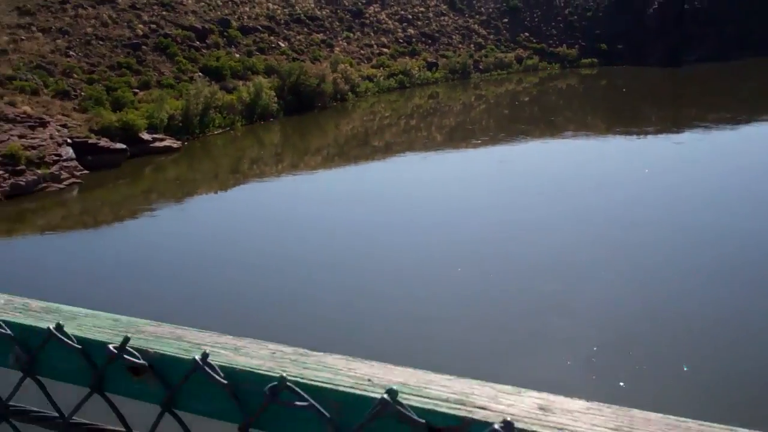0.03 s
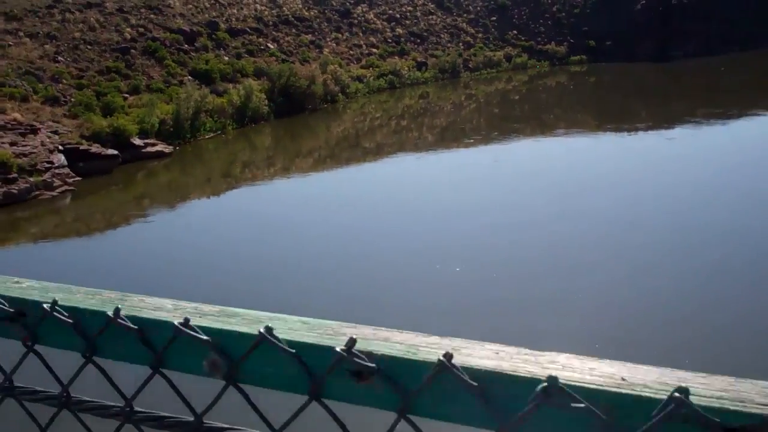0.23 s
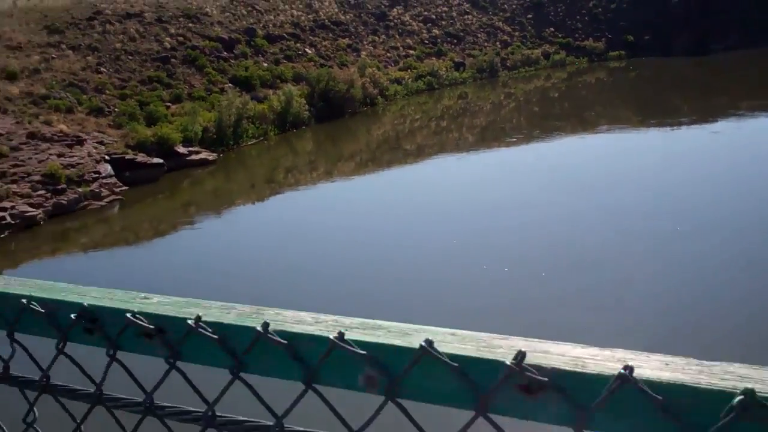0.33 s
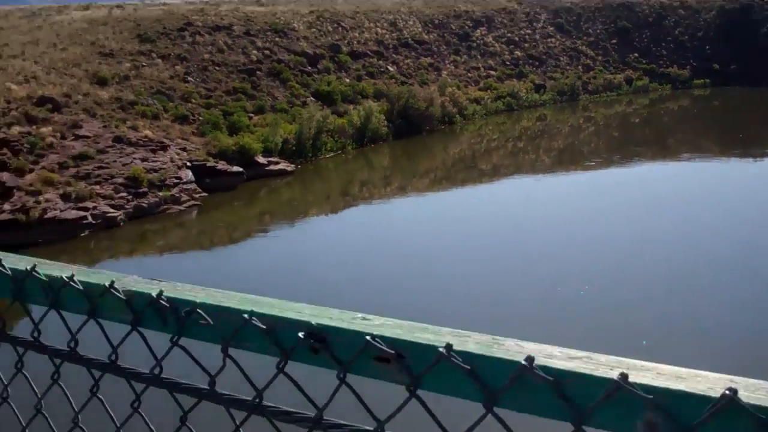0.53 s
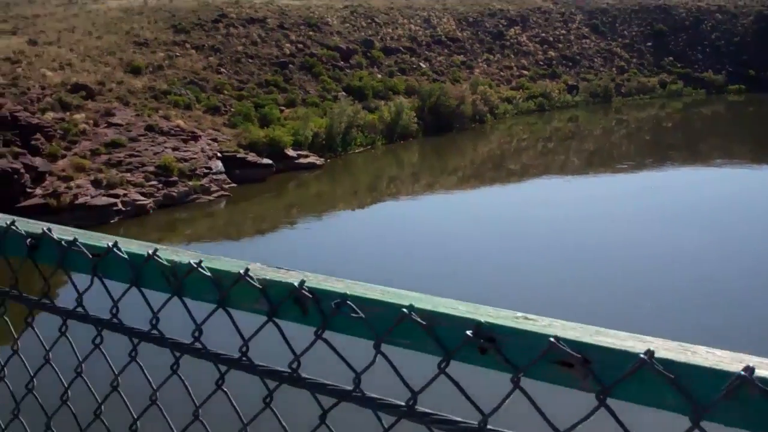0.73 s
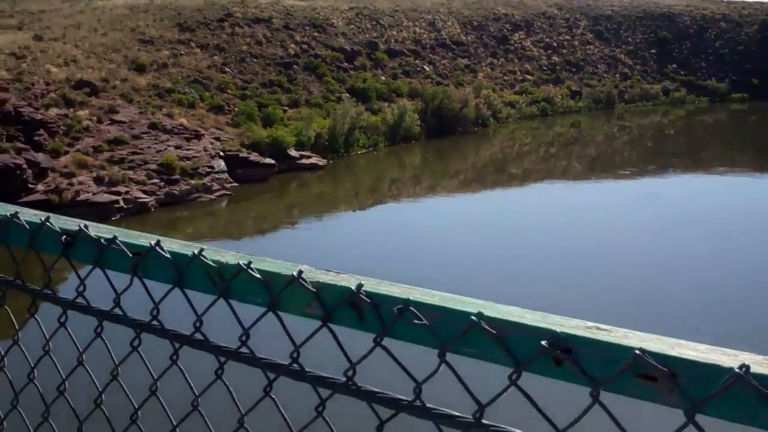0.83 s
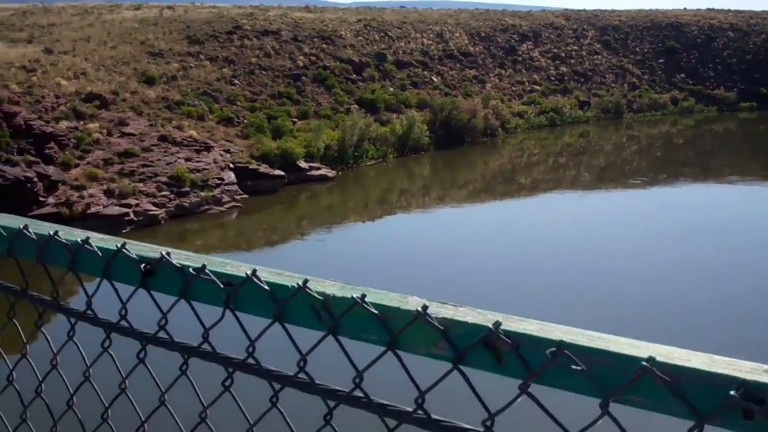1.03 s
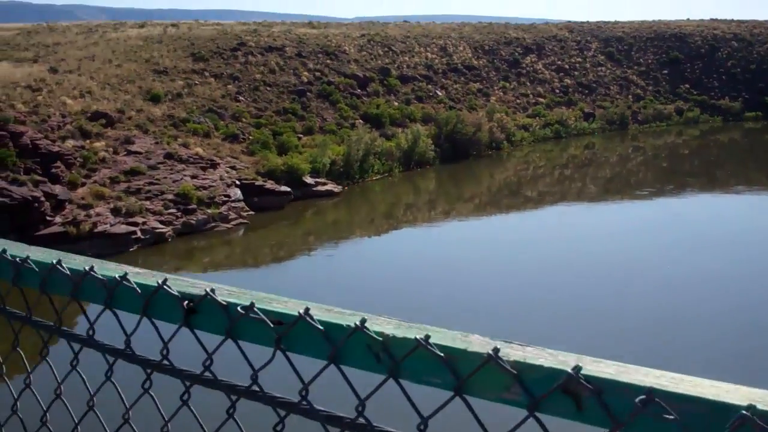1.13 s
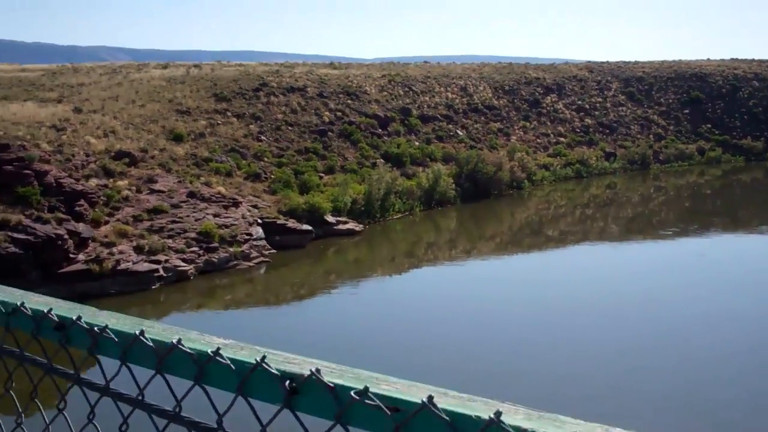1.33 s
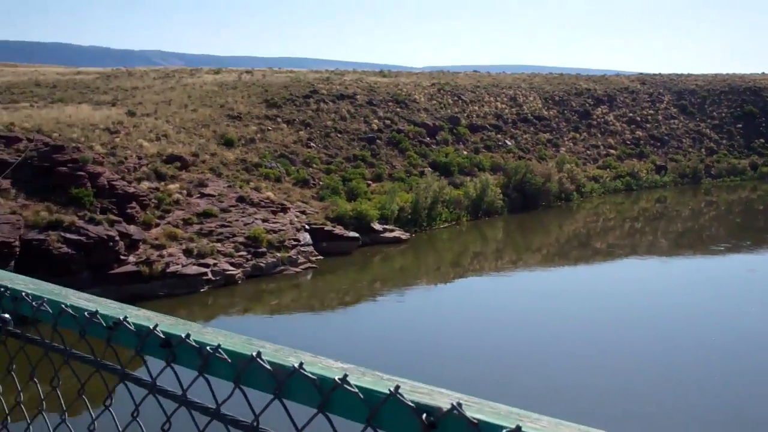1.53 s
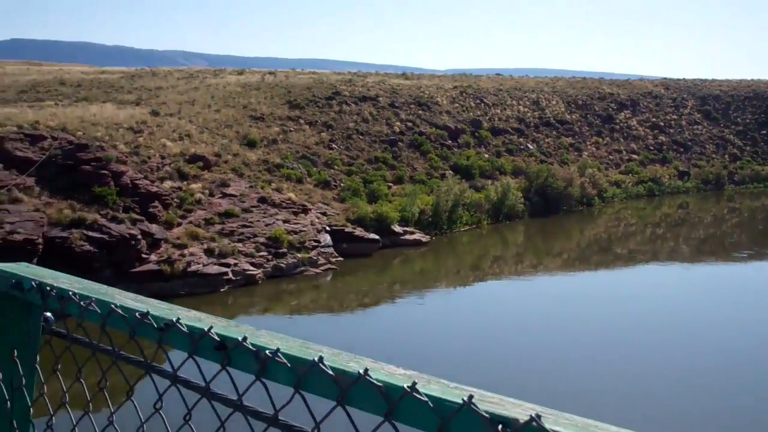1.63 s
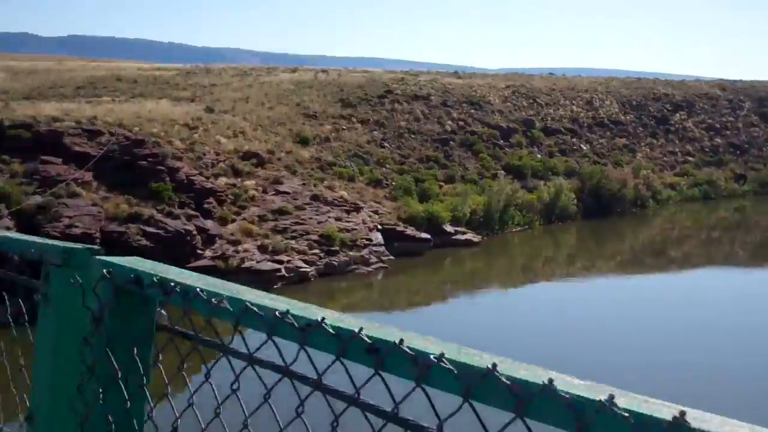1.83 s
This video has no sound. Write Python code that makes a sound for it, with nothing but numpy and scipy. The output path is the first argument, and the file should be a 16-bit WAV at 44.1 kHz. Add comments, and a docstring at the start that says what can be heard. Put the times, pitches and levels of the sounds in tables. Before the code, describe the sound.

Close rubbing on the microphone builds on the left, with a small knock at 0.3 seconds, and is strongest and scratchiest around 0.5 before fading by 0.7. A light knock comes near 1.1 seconds and a sharp click at 1.2, with soft shuffling. A second, weaker rustle follows from 1.3 to 1.7 seconds. A faint, steady outdoor hiss continues throughout.

```python
"""A faint hiss hangs over a quiet river; a small tick and a knock sound, and a rustle swells on the left.
On a footbridge a hand-held camera is turned along the railing, and something, probably a sleeve or a
finger, rubs its left side in two groups of strokes. Stick-slip friction drives the case, which rings
with a hollow tone under a bright fizz. Short creaks and knocks from the deck or the grip fall among
the strokes, each the free vibration of a few heavily damped modes."""
import sys
import numpy as np
from scipy import signal
from scipy.fft import rfft, irfft
from scipy.io import wavfile
from scipy.ndimage import uniform_filter1d

SR = 44100
rng = np.random.default_rng(int(sys.argv[2]) if len(sys.argv) > 2 else 0)


def persist_wave(psi):
    """Save psi, clipped to +-1, as 16-bit WAV."""
    counts = np.round(np.clip(psi, -1, 1) * 32767).astype(np.int16)
    wavfile.write(sys.argv[1], SR, np.atleast_2d(counts).T)


N = 83790


def amp(db):
    """Amplitude ratio: tenfold for every 20 dB."""
    return 10 ** (np.asarray(db) / 20)


def unit_rms(x):
    """Normalisation to unit mean power."""
    return x / np.sqrt(np.mean(x ** 2) + 1e-20)


def decay(t, t60):
    """Exponential damping: 60 dB down after t60 seconds."""
    return np.exp(-np.log(1000) * t / t60)


def curve_at(points, hz):
    """Interpolation on a logarithmic frequency axis."""
    f, value = np.transpose(points)
    return np.interp(np.log(hz + 1), np.log(f + 1), value)


def colour(x, points):
    """Minimum-phase filtering: the phase follows from the gain curve by the Hilbert transform."""
    log_gain = np.log(amp(curve_at(points, abs(np.fft.fftfreq(N, 1 / SR)))))
    response = np.exp(np.conj(signal.hilbert(log_gain)))
    return irfft(rfft(x) * response[:N // 2 + 1], N)


def band(x, hz, spread):
    """Band-pass filtering from hz / spread to hz * spread."""
    return signal.sosfilt(signal.butter(2, [hz / spread, hz * spread], "band", fs=SR, output="sos"), x)


def pan(db):
    """Direction by level difference: the left exceeds the right by db."""
    return amp(np.array([[db], [-db]]) / 2)


def add(mix, start, sound):
    """Superposition of a sound on the mix, from a start in seconds."""
    part = mix[:, round(start * SR):][:, :sound.shape[-1]]
    part += sound[..., :part.shape[1]]


# Spectrum of the hiss. Each row: frequency in Hz, relative spectral level in dB.
HISS_SPECTRUM = [(12, -2), (20, -2.5), (211, -1.5), (419, -3.5), (551, -0.5), (766, -5), (954, -2),
                 (1090, -5), (1480, -9), (2060, -11.5), (3560, -10), (3970, -8), (4550, -9), (5820, -11),
                 (14000, -11.5)]
# Likeness of its two sides. Each row: frequency in Hz, left-right correlation.
HISS_CORRELATION = [(30, 0.88), (200, 0.53), (600, 0.64), (1500, 0.12), (4000, 0.05), (14000, 0.017)]


def valley_hiss(level_db=-54, patch_db=1.5):
    """Partly coherent noise: the valley's hiss is alike on both sides in the bass, diffuse above."""
    hz = np.fft.rfftfreq(1024, 1 / SR)
    a, b, c, d, patches = rng.standard_normal((N // 256 + 5, len(hz), 5)).T
    left, independent = a + 1j * b, c + 1j * d
    # Smoothing over frequency and time leaves faint drifting patches of level.
    patches = unit_rms(uniform_filter1d(uniform_filter1d(patches, size=10, axis=0), size=12, axis=1))
    correlation = curve_at(HISS_CORRELATION, hz)[:, None]
    right = correlation * left + np.sqrt(1 - correlation ** 2) * independent
    gain = amp(curve_at(HISS_SPECTRUM, hz)[:, None] + patch_db * patches)
    hiss = signal.istft(np.array([left, right]) * gain, nperseg=1024, noverlap=768)[1][:, :N]
    return amp(level_db) * unit_rms(hiss) * pan(db=1.25)


def slips(per_second=12000, spread_db=2.5, judder_db=1.0, judder_hz=130):
    """Stick-slip friction: a dense train of tiny releases whose strength judders unevenly."""
    size = amp(spread_db * np.minimum(rng.exponential(1, N), 4)) * rng.choice([-1, 1], N)
    rolloff = 1 + (np.fft.rfftfreq(N, 1 / SR) / judder_hz) ** 2
    judder = unit_rms(irfft(rfft(rng.standard_normal(N)) / rolloff, N))
    released = rng.random(N) < per_second / SR
    return size * released * amp(judder_db * judder)


# Envelope of the shifting grip. Each row: time in seconds, level in dB.
GRIP_ENVELOPE = [(1.0, -68), (1.09, -52.5), (1.15, -59), (1.201, -51.5), (1.26, -53.5), (1.4, -54.5),
                 (1.62, -56), (1.72, -75)]
# Its spectrum. Each row: frequency in Hz, relative spectral level in dB.
GRIP_SPECTRUM = [(60, -25), (250, -1), (600, -3), (1150, 2), (2200, -10), (4500, -3.5), (7000, -18.5),
                 (14000, -9.5)]


def grip_shuffle():
    """Soft sliding friction of the grip, equally loud on both sides and partly correlated."""
    times, db = np.transpose(GRIP_ENVELOPE)
    shared = slips()
    pair = np.array([unit_rms(colour(shared + slips(), GRIP_SPECTRUM)) for side in range(2)])
    return pair * amp(np.interp(np.arange(N) / SR, times, db, left=-np.inf, right=-np.inf))


# Dull bumps. Each row: start in seconds, length in seconds, level in dB, centre frequency in Hz.
CASE_BUMPS = [(.232, .025, -47.5, 357), (.311, 0.048, -51, 153), (0.424, .1, -58.5, 166),
              (.475, 0.079, -58, 92), (1.065, 0.038, -63, 124), (1.57, 0.047, -63, 114)]


def case_bumps():
    """Narrow-band noise bursts: the case rumbles briefly as it shifts in the grip."""
    out = np.zeros((2, N))
    for start, length, db, hz in CASE_BUMPS:
        progress = np.arange(0, 1, 1 / (length * SR))
        rumble = unit_rms(band(rng.standard_normal(N), hz, spread=1.18)[-len(progress):])
        add(out, start, amp(db) * rumble * np.sin(np.pi * np.sqrt(progress)) * pan(db=1.5))
    return out


def deck_echoes(pair, level_db=-10, t60=0.084):
    """Scattering: deck and railing spread the right channel into a brief tail on both sides."""
    t = np.arange(SR // 4) / SR
    tail = rng.standard_normal((2, len(t))) * decay(t, t60) * (t > 0.003)
    tail /= np.linalg.norm(tail[0])
    return amp(level_db) * signal.fftconvolve(np.sqrt(2) * pair[1:], tail, axes=1)[:, :N]


def arrival_lag(pair, delay_s=0.00013):
    """Arrival-time difference: the left microphone lags the right."""
    lag = np.exp(-2j * np.pi * np.fft.rfftfreq(N, 1 / SR) * delay_s)
    return np.array([irfft(rfft(pair[0]) * lag, N), pair[1]])


# Creaks and knocks. Each row: start in seconds, gain in dB, pitch in Hz, 60 dB decay time in seconds,
# left-right difference in dB.
KNOCK_EVENTS = [(0.074, -40, 1090, 0.013, 3), (0.3158, -24, 879, 0.027, 11),
                (0.3218, -25.5, 820, 0.016, 16), (.760, -48.5, 833, 0.037, 12),
                (1.0719, -27, 447, 0.018, 2), (1.106, -43, 434, 0.04, 6), (1.215, -15.5, 1320, 0.005, 1.5),
                (1.2192, -35.5, 470, 0.014, 5), (1.793, -44.5, 583, 0.021, 6)]
# Their modes. Each row: multiple of the pitch, relative level in dB, fraction of the decay time.
DAMPED_MODES = [(.55, -13, 0.88), (1.001, -1.5, 1), (1.45, -9.5, 0.73), (2.3, -21, 0.33)]


def knocks(rise_s=0.00039):
    """Damped free vibration: each sudden slip rings a few modes, with little bass below them."""
    out, t = np.zeros((2, N)), np.arange(SR // 10) / SR
    attack = 1 - np.exp(-t / rise_s)
    for start, db, hz, t60, pan_db in KNOCK_EVENTS:
        ring = sum(amp(mode_db) * decay(t, t60 * fraction) * np.sin(2 * np.pi * hz * ratio * t)
                   for ratio, mode_db, fraction in DAMPED_MODES)
        low_cut = signal.butter(2, 0.63 * hz, "high", fs=SR, output="sos")
        add(out, start, amp(db) * signal.sosfilt(low_cut, attack * ring) * pan(pan_db))
    return out


# Catches in the rub. Each row: start in seconds, peak before panning in dB, centre frequency in Hz,
# left-right difference in dB.
SNAG_EVENTS = [(0.0523, -41, 7140, 15), (0.3157, -28, 4300, 14), (.350, -30, 4100, 14),
               (0.4604, -28, 4340, 10), (.604, -26, 4170, 15), (1.207, -41, 8100, -18),
               (1.2156, -40, 7900, 19), (1.474, -29.5, 4830, -10)]


def snags(rebound_s=0.00032, rebound_db=-16.5):
    """Impulse excitation: each larger catch gives a bright crack and a weaker rebound."""
    out = np.zeros((2, N))
    for start, db, hz, pan_db in SNAG_EVENTS:
        crack = band(signal.unit_impulse(SR // 100), hz, spread=1.47)
        crack = amp(db) * crack / abs(crack).max() * pan(pan_db)
        add(out, start, crack)
        add(out, start + rebound_s, amp(rebound_db) * crack)
    return out


def case_ring(drive, level_db=-14, t60=0.08):
    """Modal overlap: many weak, closely spaced modes of the case merge into a noisy decay."""
    t = np.arange(SR // 10) / SR
    tail = rng.standard_normal(len(t)) * decay(t, t60)
    return drive + amp(level_db) * signal.fftconvolve(drive, tail / np.linalg.norm(tail))[:N]


# Path of the rub to the right microphone. Each row: frequency in Hz, gain relative to the left in dB.
FAR_GAIN = [(200, -12), (850, -19), (2000, -11), (4200, -22.5), (8000, -8), (13000, -5)]
# Likeness of the two sides. Each row: frequency in Hz, left-right correlation.
FAR_CORRELATION = [(200, 0.33), (900, 1), (2000, 0.65), (5000, 0.16), (13000, 0.13)]


def far_side(near, independent):
    """Transmission loss: the rub reaches the right side weakened and only partly coherent."""
    correlation = curve_at(FAR_CORRELATION, np.fft.rfftfreq(N, 1 / SR))
    spectrum = correlation * rfft(near) + np.sqrt(1 - correlation ** 2) * rfft(independent)
    return colour(irfft(spectrum, N), FAR_GAIN)


# Envelopes of the rub: the lead-in, the first group of strokes and the second group.
# Each row: time in seconds, relative fizz level in dB, relative hollow level in dB.
LEAD_IN = [(0.11, -73, -61), (0.128, -80, -68), (0.172, -61, -52.5), (0.244, -52.5, -47), (0.268, -57, -53),
           (0.3, -59, -49)]
FIRST_STROKES = [(0.335, -43, -53), (0.339, -46.5, -49), (0.471, -33, -40.5), (0.523, -40.5, -46.5),
                 (0.531, -41.5, -44), (0.597, -45, -47.5), (0.603, -40.5, -42), (0.629, -37.5, -44),
                 (0.675, -46, -47), (0.721, -69, -66.5), (0.725, -58.5, -69)]
SECOND_STROKES = [(1.26, -60, -55), (1.308, -67, -73), (1.318, -61.5, -55), (1.372, -53.5, -50),
                  (1.392, -61, -64), (1.42, -58, -59), (1.478, -44.5, -43.5), (1.486, -43.5, -47),
                  (1.496, -43, -46), (1.508, -43, -42), (1.528, -53.5, -51), (1.608, -50, -49),
                  (1.7, -76, -70.5)]
# Spectra of the treble fizz and the hollow midrange, and the added colour of the second group.
# Each row: frequency in Hz, relative gain in dB.
FIZZ_SPECTRUM = [(900, -59), (1900, -11.5), (2300, -14), (2750, -2.5), (3300, -4.5), (4300, -1.5),
                 (5200, -6), (6000, -8), (7400, -19), (9300, -14), (11000, -20.5), (14000, -23)]
HOLLOW_SPECTRUM = [(60, -31.5), (200, -18), (400, -13.5), (600, -7.5), (700, 0.5), (810, -0.5),
                   (1010, -6.5), (1240, -1), (1480, -11), (1700, -11), (2100, -32.5), (3200, -37)]
SECOND_COLOUR = [(300, -3), (750, -1.5), (980, 3.5), (1300, -7.5), (1650, 3), (2100, 11), (2900, 1),
                 (4300, -1.5), (6400, 5), (8000, 1), (14000, 3.5)]


def rub(envelope, tilt=None, fizz_gain_db=5.5, hollow_gain_db=5):
    """Forced vibration: slips on the left side drive the hollow of the case and a fizz above it."""
    times, fizz_db, hollow_db = np.transpose(envelope)
    t = np.arange(N) / SR
    fade_in = np.clip((t - times[0]) / 0.011 + 1, 0, 1)
    fade_out = np.clip((times[-1] - t) / 0.01 + 1, 0, 1)
    fizz_gain = amp(fizz_gain_db + np.interp(t, times, fizz_db))
    hollow_gain = amp(hollow_gain_db + np.interp(t, times, hollow_db))
    rustles = []
    for drive in (case_ring(slips()), case_ring(slips())):
        drive = colour(drive, tilt) if tilt else drive
        fizz = fizz_gain * unit_rms(colour(drive, FIZZ_SPECTRUM))
        hollow = hollow_gain * unit_rms(colour(drive, HOLLOW_SPECTRUM))
        rustles.append(fade_in * fade_out * (fizz + hollow))
    left, independent = rustles
    return np.array([left, far_side(left, independent)])


def scene():
    """Linear superposition of rustle, knocks, grip, echoes and outdoor hiss."""
    knocking = knocks()
    rustle = rub(LEAD_IN + FIRST_STROKES) + rub(SECOND_STROKES, SECOND_COLOUR) + snags() + case_bumps()
    return rustle + arrival_lag(knocking + grip_shuffle()) + deck_echoes(knocking) + valley_hiss()


def record(dry):
    """Band limiting: a linear-phase low-pass removes the highest treble."""
    low_pass = signal.firwin(1023, cutoff=14250, window=("kaiser", 9), fs=SR)
    return signal.oaconvolve(dry, low_pass[None], "same")


dry = scene()
out = record(dry)
persist_wave(out)
```